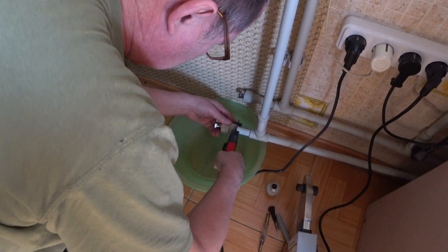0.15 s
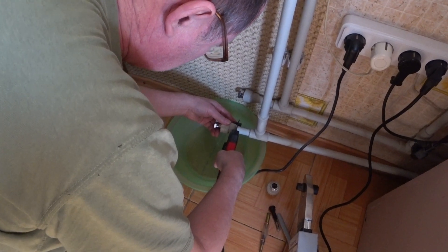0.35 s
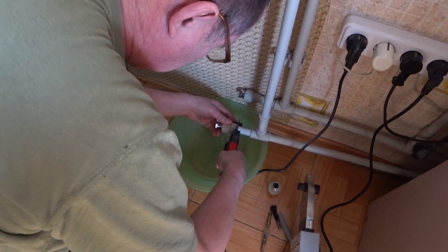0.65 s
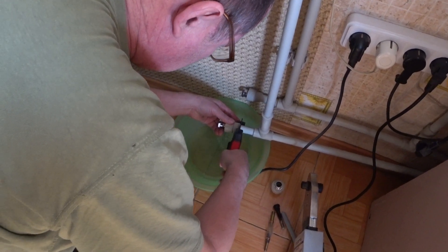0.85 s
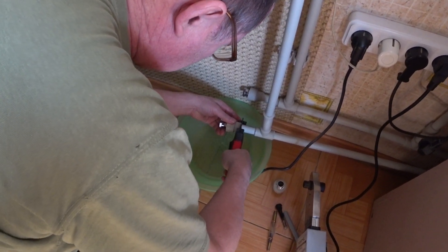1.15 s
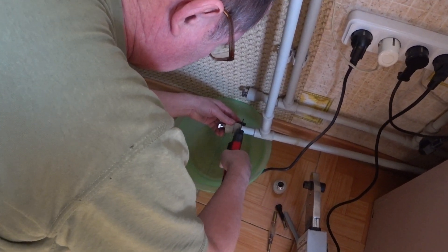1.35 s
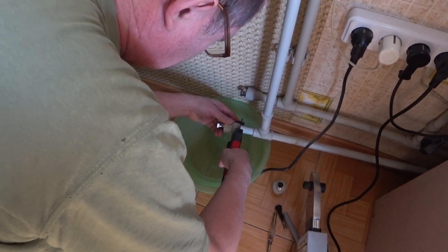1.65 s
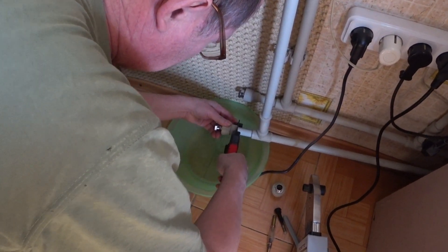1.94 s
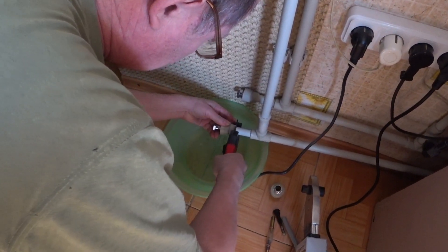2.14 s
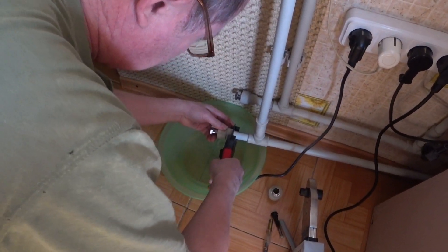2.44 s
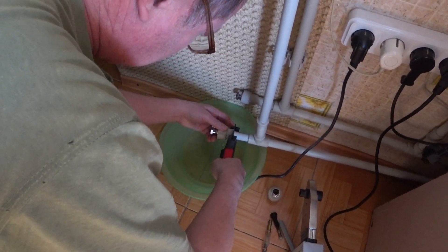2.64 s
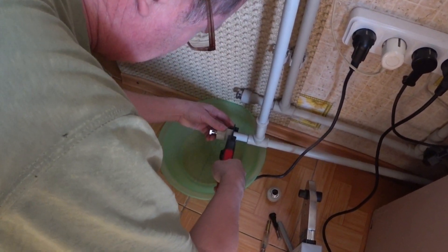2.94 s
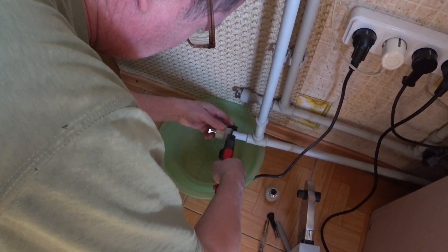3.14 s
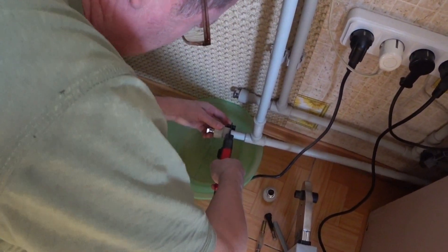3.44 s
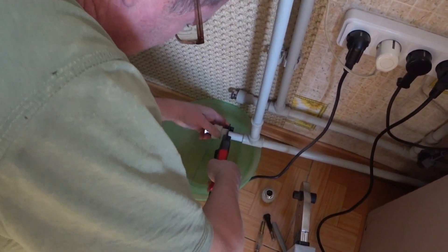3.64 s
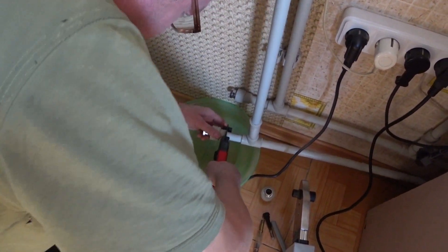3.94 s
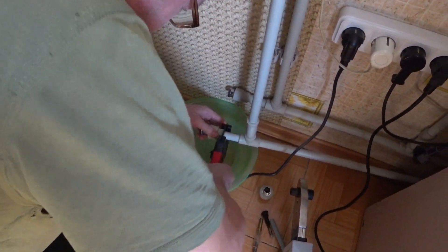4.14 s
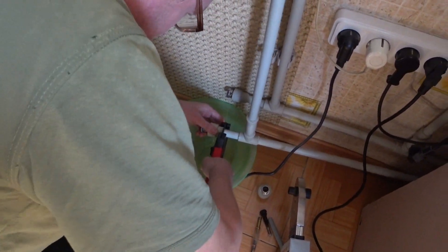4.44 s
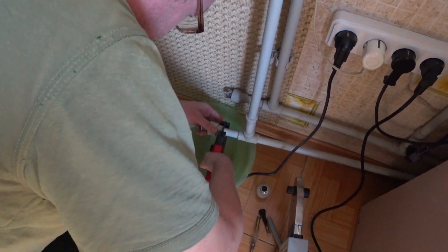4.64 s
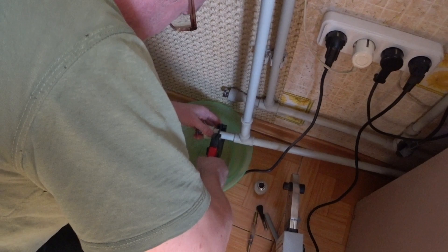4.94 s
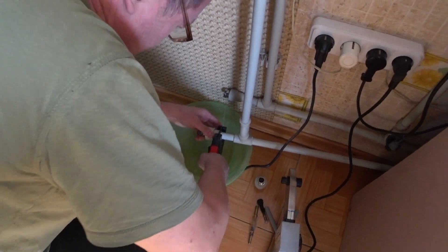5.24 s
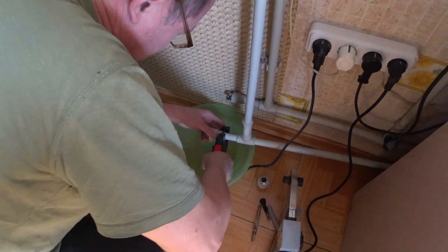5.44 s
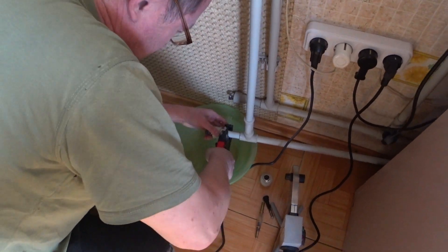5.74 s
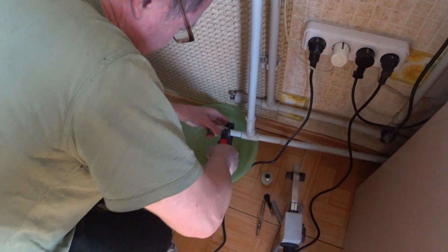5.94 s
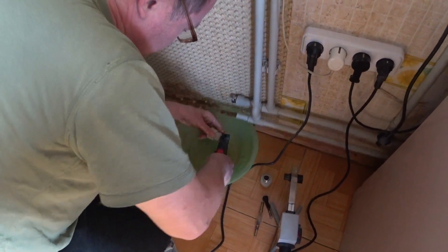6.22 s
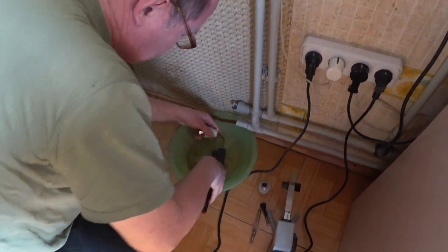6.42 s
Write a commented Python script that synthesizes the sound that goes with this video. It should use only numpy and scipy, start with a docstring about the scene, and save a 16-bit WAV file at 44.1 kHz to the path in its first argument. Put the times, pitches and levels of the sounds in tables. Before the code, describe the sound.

A ratchet cutter works through a plastic water pipe, heard close from above in a small room with a short, bright echo. Light steel ticks lead to a sharp snap at 0.2 seconds, and more ticks follow around 0.5, 1.3 and 1.8 seconds. A faint electrical hum comes up near 2 seconds. Loud snaps land at 2.3 and 2.6 seconds, and the jaws knock the hollow pipe at 3.7 and 4.5. From 4.1 seconds the snaps come faster, two to four a second, with ticks between and a soft blade hiss swelling before several. A plastic basin booms softly when nudged. From 4.5 seconds a thin leak hisses and faintly whistles. At 6 seconds water gushes briefly, with two weaker spurts around 6.4, sloshing into the basin amid quick clicks and one last snap just before 6.5 seconds.

```python
"""Sharp steel snaps and light ticks ring in a small tiled room: a ratchet cutter is squeezed step by step
through a plastic water pipe. The pawl snaps and ticks back, the jaws knock the hollow pipe, the blade hisses.
Water seeps from the cut, then spurts into a plastic basin that booms softly when nudged. A mains hum
comes up on the way; a camera with two close microphone ports listens from above."""
import sys
import numpy as np
from scipy import signal
from scipy.fft import rfft, irfft, next_fast_len
from scipy.io import wavfile
from scipy.ndimage import uniform_filter1d, map_coordinates

SR = 44100
rng = np.random.default_rng(int(sys.argv[2]) if len(sys.argv) > 2 else 0)


def generate_wav(sig):
    """Save sig (samples, or channels by samples) to the path in sys.argv[1] as 16-bit PCM at SR."""
    pcm = np.round(np.clip(np.atleast_2d(sig).T, -1, 1) * 32767).astype(np.int16)
    wavfile.write(sys.argv[1], SR, pcm)


N = 290178
PAD = 2 ** 14  # samples for one hit to ring out

# ratchet clicks: (time [s], peak [dB], low end [dB], treble [dB], favoured pitch [Hz], room send [dB])
CLICKS = [(0.0403, -31.5, -6.5, -24.5, 2180, -20), (0.084, -35, 4, -21, 2260, -23.5),
          (0.112, -31.5, -2, -31.5, 2240, -28), (0.2285, -7, -16, -4.5, 6230, -15.5),
          (0.433, -33.5, -13, -8.5, 4800, -31.5), (0.4368, -30, -3, -10.5, 4770, -26),
          (0.466, -27, -11.5, -6, 3930, -30.5), (0.5345, -37.5, -15, -12.5, 4060, -30.5),
          (1.3014, -47, -19, -11, 4550, -19), (1.311, -38.5, -4.5, -14, 1550, -11.5),
          (1.3238, -20.5, -10, -19, 1510, -24), (1.3409, -21.5, -14, -4.5, 3770, -31.5),
          (1.4268, -37, 0, -24, 2230, -34.5), (1.8062, -34, 6, -13, 2195, -18.5),
          (1.8089, -25, -13.5, -5, 2165, -25.5), (1.8251, -26.5, -26.5, -9, 3970, -35),
          (1.8569, -31, -13, -14, 3950, -29.5), (2.1156, -50.5, -18, 1.5, 7180, -20),
          (2.193, -52, -12.5, -15.5, 2840, -24), (2.2506, -7.5, -29.5, -12, 6080, -19),
          (2.4739, -42, -6, -20, 2820, -26), (2.493, -46, -21, -16, 3620, -22),
          (2.556, -47, -23.5, -14, 5570, -20), (2.6414, -7, -25, -6.5, 4560, -15.5),
          (2.8653, -29.5, -21, -18, 4300, -29.5), (3.308, -49, -31, -8, 6660, -29),
          (3.3314, -40, -47, -12, 6630, -28), (3.4105, -38.5, 5.5, -14, 2430, -24),
          (3.6123, -52, -8, 2.5, 6500, -14), (3.7957, -46, -4, -5.5, 5530, -22.5),
          (4.1422, -7, -24.5, -1.5, 6100, -21.5), (4.327, -36.5, 0, -22, 4870, -21.5),
          (4.3432, -43, 2, -1, 5100, -16), (4.3559, -26.5, -12, -14, 4130, -27),
          (4.499, -18.5, -10, -18, 1550, -28.5), (4.591, -7, -22, -5.5, 5500, -15.5),
          (4.772, -21.5, -28, -9.5, 4350, -27), (4.9753, -7, -24.5, -4, 4300, -21.5),
          (5.1563, -26, -8, -16, 4300, -31), (5.214, -5, -13.5, -0.5, 3620, -17.5),
          (5.3698, -21, -24, -14.5, 4560, -43), (5.3731, -25.5, -5, -3, 1380, -21.5),
          (5.502, -9.5, -20, -4, 3330, -18.5), (5.693, -23.5, -6, -14, 4400, -24),
          (5.7514, -7, -15, 1, 4200, -16.5), (5.878, -20, -25, -10.5, 3740, -29),
          (5.9416, -32, -7, -5, 4760, -36), (5.9957, -11.5, -16, 1.5, 7800, -31.5),
          (5.997, -5, -16.5, -7, 4470, -19.5), (6.138, -23, -2, -18.5, 1810, -27),
          (6.1613, -19.5, -37, -15.5, 3600, -18), (6.2264, -24.5, -14, -4.5, 7400, -14),
          (6.2371, -23, 4.5, -15.5, 2370, -25.5), (6.2442, -26, -15, -11, 5500, -26),
          (6.2631, -17.5, -11.5, -28.5, 3620, -28.5), (6.323, -22, -2, 2, 3970, -20),
          (6.37, -24.5, -44, -6, 5470, -16), (6.4496, -6.5, -11, 1.5, 6150, -17.5)]
# spurts from the cut: (start [s], level [dB], rise [s], length [s])
GUSHES = [(6.007, -24.5, 0.017, 0.19), (6.364, -32.5, 0.033, 0.07), (6.454, -33.5, 0.043, 0.071)]


def amp(db):
    return 10 ** (np.asarray(db) / 20)


def unit(x):
    return x / np.sqrt(np.mean(x ** 2) + 1e-20)


def along(points, hz):
    """Read (frequency [Hz], value) points on a log axis."""
    freqs, values = np.transpose(points)
    return np.interp(np.log(hz + 1), np.log(freqs + 1), values)


def faders(rows):
    """A gain per sample for each dB column, silent before the first row."""
    times, *levels = np.transpose(rows)
    return [amp(np.interp(np.arange(N) / SR, times, db, left=-120)) for db in levels]


def filtered(x, response):
    """Pass x through a complex frequency response."""
    size = next_fast_len(x.shape[-1] + 4096)
    return irfft(rfft(x, size) * response(np.fft.rfftfreq(size, 1 / SR)), size)[..., :x.shape[-1]]


def eq(x, curve):
    """Colour x with a (frequency [Hz], level [dB]) curve."""
    return filtered(x, lambda hz: amp(along(curve, hz)))


def modes(table, hz):
    """Response of resonances (centre [Hz], width [Hz], level [dB]), alternating in sign."""
    return sum((-1) ** k * amp(db) * 1j * hz * width / (centre ** 2 - hz ** 2 + 1j * hz * width)
               for k, (centre, width, db) in enumerate(table))


def rush(spectrum, patchy_db, crackle):
    """Coloured stereo noise with patches of random gain and sparse sharp droplets."""
    drops = crackle * rng.exponential(1, N) * (rng.random(N) < .04)
    bands = signal.stft(rng.standard_normal((2, N)) * (1 + drops), nperseg=256)[2]
    patches = uniform_filter1d(rng.standard_normal(bands.shape[1:]), size=4, axis=0)
    patches = uniform_filter1d(patches, size=8, axis=1)
    pair = signal.istft(bands * amp(patchy_db * unit(patches)), nperseg=256)[1][:, :N]
    return ports(*unit(eq(pair, spectrum)))


def add_hit(out, time, db, direct, room=0):
    """Place a hit and its reverb; the rows of out are what the ports share and what differs."""
    at = round(time * SR)
    peak = np.sort(np.abs(direct))[-6:].mean()
    out[:, at:at + PAD] += amp(db) * room
    out[0, at:at + len(direct)] += amp(db) * direct / peak


def ratchet():
    """The pawl snaps and ticks back: each click is a few milliseconds of steel chatter."""
    # cutter resonances: (centre [Hz], width [Hz], level [dB])
    steel = [(1493, 97, -2.5), (2482, 250, 4), (2620, 600, 0), (3577, 380, -1), (4100, 150, -3.5),
             (4610, 130, -2.5), (5143, 180, -3), (5790, 520, -1), (6200, 150, -1), (6780, 310, -1.5),
             (8010, 250, 5.5), (8020, 240, 2), (9740, 500, -7)]
    out, t = np.zeros((2, N + PAD)), np.arange(PAD // 8) / SR
    for time, db, low_db, top_db, pitch_hz, room_db in CLICKS:
        # a full snap chatters longer and its reverb holds level; a tick is more pitched and its reverb drops
        # fast at first
        chatter_s, favour_db, early_drop = (0.00239, 2, .1) if db > -12 else (0.0019, 7, 1.5)
        tone = [(300, low_db - 3.5), (1000, low_db - 6), (1500, low_db + 10.5),
                (2800, 0.48 * low_db + 2.5), (4500, 0), (6500, 0), (8500, top_db), (10800, top_db + 1.85)]
        struck = np.array(steel) + np.outer(2.5 * rng.standard_normal(len(steel)), [0, 0, 1])
        # where the tooth lands lifts the modes near one pitch
        favour = lambda hz: 2 + np.abs(modes([(pitch_hz, 320, favour_db)], hz)) ** 2
        colour = lambda hz: amp(along(tone, hz)) * (1.3 + np.abs(modes(struck, hz))) * favour(hz)
        age = t / chatter_s
        chatter = age * np.exp(-age ** 1.163) * filtered(rng.standard_normal(len(t)), colour)
        add_hit(out, time, db, chatter, amp(room_db) * tiled_room(colour, early_drop))
    return ports(*out[:, :N])


def jaws():
    """The jaws knock the pipe: a tick, the crack of contact and one push into the hollow plastic."""
    # (time [s], peak [dB], room send [dB])
    knocks = [(0.22, -30, -18.5), (2.643, -38.5, -11), (3.723, -13, -28.5), (4.477, -17, -24.5),
              (4.604, -29.5, -16), (5.211, -33.5, -12.5)]
    # pipe resonances: (centre [Hz], width [Hz], level [dB])
    pipe = [(467, 65, 13.5), (1143, 89, 19), (1646, 53, 20), (2647, 89, 11.5)]
    smeared = np.array(pipe) * [1, 4, 1]  # the room widens the pipe's modes
    out, t = np.zeros((2, N + PAD)), np.arange(PAD // 8) / SR
    push = np.sin(2 * np.pi * np.clip(t / 0.0006, 0, 1))
    body = filtered(push, lambda hz: modes(pipe, hz))
    for time, db, room_db in knocks:
        tick = filtered(rng.standard_normal(len(t)), lambda hz: modes([(4500, 4000, 0)], hz))
        crack = filtered(rng.standard_normal(len(t)), lambda hz: modes([(2300, 2500, 0)], hz))
        room = tiled_room(lambda hz: np.abs(modes(smeared, hz)) + 0.26, early_drop=1.2)
        add_hit(out, time - .005, db - 29, (t < .005) * tick)
        add_hit(out, time, db - 14, amp(-60 * t / .02) * crack)
        add_hit(out, time, db, body, amp(room_db) * room)
    return ports(*out[:, :N])


def blade():
    """The blade hisses as the handles close, swelling up to the next loud snap."""
    # (start [s], final level [dB])
    squeezes = [(2.568, -50.5), (4.089, -45), (4.86, -45), (5.432, -43), (5.72, -52), (5.984, -33)]
    # (frequency [Hz], level [dB])
    hiss_tone = [(710, -21), (1200, -6), (2070, -18), (2520, -8), (4120, -5), (6130, -3), (11000, -17),
                 (14300, -45.5), (22000, -120)]
    t, grip = np.arange(N) / SR, 0
    for start, db in squeezes:
        snap = min(time for time, peak_db, *_ in CLICKS if time > start and peak_db > -16)
        grip += amp(db) * np.clip((t - start) / (snap - start), 0, 1) ** 0.73 * (t < snap)
    return grip * rush(hiss_tone, patchy_db=-1.5, crackle=.6)


def seep():
    """A thin leak hisses and the cut pipe whistles faintly; the whistle stops at the first gush."""
    # (time [s], hiss [dB], whistle [dB])
    leak = [(4.5, -56.5, -74), (4.7, -45.5, -62), (4.95, -62.5, -57), (5.12, -48.5, -54.5),
            (5.35, -47.5, -54), (5.65, -61, -68), (5.75, -49, -75), (5.95, -56.5, -78), (6.1, -61, -60)]
    # (frequency [Hz], level [dB])
    trickle_tone = [(410, -41), (700, -19.5), (1270, -9.5), (1400, -2), (1640, -16.5), (1820, -3),
                    (2170, -19.5), (2890, -10.5), (3400, -10.5), (6780, -7.5), (11000, -24.5), (14300, -50),
                    (22000, -120)]
    # (centre [Hz], width [Hz], level [dB])
    whistle_modes = [(1550, 120, -6.5), (1790, 150, -12), (2740, 300, -1.5)]
    hiss_gain, whistle_gain = faders(leak)
    whistle_gain *= np.arange(N) / SR < GUSHES[0][0]
    whistle = unit(filtered(rng.standard_normal((2, N)), lambda hz: modes(whistle_modes, hz) ** 2))
    return hiss_gain * rush(trickle_tone, patchy_db=3, crackle=.8) + whistle_gain * ports(*whistle)


def jet():
    """Water hisses out of the cut: each gush rises, sags while it holds and dies quickly."""
    # (frequency [Hz], level [dB])
    jet_tone = [(880, -29), (1400, -11.5), (1750, 1), (2000, -16), (2260, -10.5), (3150, -5), (5370, -4),
                (5840, -3.5), (11000, -17), (14300, -49), (22000, -120)]
    sag_db_per_s, release_db_per_s = 44, 300
    t, flow = np.arange(N) / SR, 0
    for start, db, rise_s, length_s in GUSHES:
        age = t - start
        fall_db = sag_db_per_s * np.abs(age) + release_db_per_s * np.maximum(age - length_s, 0)
        flow += np.clip(age / rise_s, 0, 1) * amp(db - fall_db)
    return flow * rush(jet_tone, patchy_db=2, crackle=.5)


def splash():
    """Water sloshes into the basin and drums on its floor."""
    # (time [s], level [dB])
    slosh = [(5.995, -40), (6.02, -40), (6.19, -47), (6.26, -37.5), (6.36, -49.5), (6.4, -41),
             (6.45, -52.5), (6.58, -44.5)]
    # spray and basin floor: (frequency [Hz], level [dB])
    splash_tone = [(150, -19.5), (250, -5.5), (324, -15), (471, -5.5), (700, -12.5), (1710, -10),
                   (2130, -12), (3000, -9), (3900, -35.5), (6600, -120)]
    drum_tone = [(20, -20), (50, -3), (150, -1.5), (250, -20), (22000, -120)]
    drum = amp(-13.5) * unit(eq(rng.standard_normal(N), drum_tone))
    return faders(slosh)[0] * (drum + rush(splash_tone, patchy_db=3, crackle=.9))


def basin():
    """Soft nudges ring the basin's lowest mode, sagging in pitch, and a weaker one above."""
    # (time [s], level [dB], pitch [Hz], 60 dB decay [s])
    nudges = [(2.302, -46, 207, 0.17), (4.218, -36.5, 265, 0.17), (4.889, -44, 245, 0.15),
              (5.381, -42, 198, 0.15), (5.557, -41, 255.4, 0.16), (5.701, -41.5, 272, 0.11),
              (6.065, -37, 250, 0.25), (6.264, -31, 246, 0.2)]
    out, t = np.zeros(N + PAD), np.arange(PAD) / SR
    attack = 1 - np.exp(-t / 0.0079)
    for time, db, hz, t60 in nudges:
        phase = 2 * np.pi * hz * (t + 0.000728 * (1 - np.exp(-t / 0.0025)))
        ring = np.sin(phase) + amp(-9.5 - 60 * t / 0.15) * np.sin(1.6 * phase)
        out[round(time * SR):][:PAD] += amp(db - 60 * t / t60) * attack * ring
    return out[:N]


def tiled_room(colour, early_drop):
    """Reverb of one hit: it builds, drops fast at first, then dies band by band."""
    # (frequency [Hz], 60 dB decay [s])
    tiles = [(300, 0.673), (800, 0.45), (2100, 0.41), (5500, 0.32), (11000, 0.27)]
    hz, frame_s, bands = signal.stft(rng.standard_normal((2, PAD)), SR, nperseg=256)
    decay = amp(-60 * frame_s / along(tiles, hz)[:, None])
    wash = filtered(signal.istft(bands * decay, SR, nperseg=256)[1][:, :PAD], colour)
    t = np.arange(PAD) / SR
    swell = (1 - np.exp(-(t / 0.0084) ** 2)) * (1 + early_drop * np.exp(-t / 0.013))
    return swell * wash / np.sqrt(np.mean(wash[:, :PAD // 8] ** 2))


def opening_tail():
    """The room is still ringing from a snap as the scene opens."""
    # (frequency [Hz], level [dB])
    snap_tone = [(530, -44), (900, -24.5), (1400, -15.5), (2000, -3), (2170, 0.5), (2970, -14), (4610, 2.5),
                 (5570, -10), (6580, -2), (11000, -12.5), (14300, -53), (22000, -120)]
    return amp(-36.5 - 60 * np.arange(N) / SR / .33) * rush(snap_tone, patchy_db=5, crackle=.6)


def mains_hum():
    """A low electrical hum whose partials each waver on their own in level and phase."""
    # (time [s], lowest partial [dB], overtones [dB])
    hum_levels = [(1.3, -77.5, -95), (1.64, -68, -71.5), (1.87, -53.5, -69.5), (2.0, -50, -61.5),
                  (2.05, -60, -80.5), (2.12, -51.5, -69.5), (2.6, -52.5, -72.5), (2.66, -63, -72),
                  (2.73, -53.5, -65.5), (2.82, -51, -70.5), (2.99, -61, -69.5), (3.16, -56.5, -62.5),
                  (3.23, -60, -68), (3.34, -45.5, -68), (3.47, -60, -69.5), (3.97, -50.5, -70),
                  (4.43, -54, -63), (4.54, -68, -69), (4.75, -51.5, -62.5), (4.82, -57, -69),
                  (4.92, -46, -64), (5.03, -64.5, -68.5), (5.2, -55, -65.5), (5.7, -56, -63.5),
                  (5.87, -58, -62), (5.97, -53, -62), (6.06, -63, -65), (6.3, -58, -58.5), (6.45, -49, -62),
                  (6.58, -56, -76)]
    # (frequency ratio, level [dB])
    overtones = [(1.5, -7), (2, 0), (2.5, -8), (3, -4)]
    hum_hz, waver_hz = 100.6, 17
    low_gain, upper_gain = faders(hum_levels)
    t = np.arange(N) / SR
    phase = 2 * np.pi * hum_hz * t
    waver = lambda: map_coordinates(rng.standard_normal(120), [t * waver_hz])
    upper = sum(amp(db + 3.8 * waver()) * np.sin(ratio * phase + .5 * waver()) for ratio, db in overtones)
    low = amp(1.2 * waver()) * np.sin(phase + 0.32 * waver())
    return np.sqrt(2) * (low_gain * low + upper_gain * upper)


def air():
    """The quiet floor of room and microphone, wider than the sources."""
    # alike and opposed in the two channels: (frequency [Hz], level [dB])
    mid_tone = [(12, -28.5), (20, -2), (61, -3), (77, -5), (153, -4), (189, -9), (346, -9.5), (572, -13.5),
                (652, -14.5), (920, -16), (1020, -17.5), (11000, -32), (14300, -57), (22000, -120)]
    side_tone = [(12, -54.5), (20, -14.5), (145, -6), (199, -12), (252, -4.5), (312, -15), (385, -4.5),
                 (572, -11.5), (688, -6.5), (11000, -36), (14300, -72.5), (22000, -120)]
    mid = amp(-62) * unit(eq(rng.standard_normal(N), mid_tone))
    side = amp(-59) * unit(eq(rng.standard_normal(N), side_tone))
    return np.array([mid + side, mid - side])


def ports(shared, differing):
    """Two close microphone ports: the left leads and is duller; part of the sound differs between them."""
    # (frequency [Hz], left phase lead [rad])
    lead = [(100, 0.19), (430, 0.55), (1800, 1.6), (2300, 1.06), (5300, 0.81), (11000, 1.2)]
    # (frequency [Hz], level [dB])
    side_tone = [(300, -3), (2000, -6.5), (6000, -15.5), (9000, -9.5)]
    pan = lambda hz: np.exp(np.outer([1, -1], .5j * along(lead, hz) - .13 * hz / (hz + 900)))
    side = eq(differing, side_tone)
    return filtered(shared, pan) + np.array([side, -side])


def scene():
    cutter = ratchet() + jaws() + opening_tail() + blade()
    water = seep() + jet() + splash()
    return cutter + water + basin() + mains_hum() + air()


def record(dry):
    """The camera's gain control ducks the bass on loud moments; the top octave is cut off steeply."""
    threshold_db, duck_db_per_db, recover_s, bass_hz = -26, 0.71, 0.019, 330
    edge_hz, top_hz = 10970, 12339
    memory = np.exp(-np.arange(SR // 4) / (recover_s * SR))
    power = np.abs(signal.fftconvolve(np.mean(dry ** 2, axis=0), memory / memory.sum())[:N])
    gain = (1 + power / amp(2 * threshold_db)) ** (-duck_db_per_db / 2)
    bass = filtered(dry, lambda hz: 1 / (1 + (hz / bass_hz) ** 4))
    rolloff = [(edge_hz, 0), (edge_hz + 250, -28), (top_hz, -45)]
    return filtered(dry + (gain - 1) * bass, lambda hz: amp(along(rolloff, hz)) * (hz < top_hz))


dry = scene()
out = record(dry)
generate_wav(out)
```